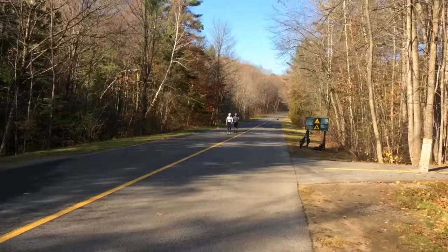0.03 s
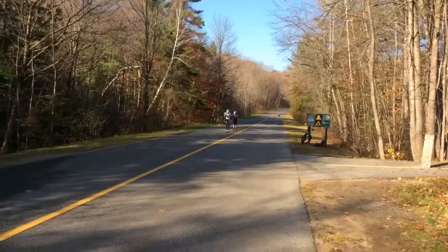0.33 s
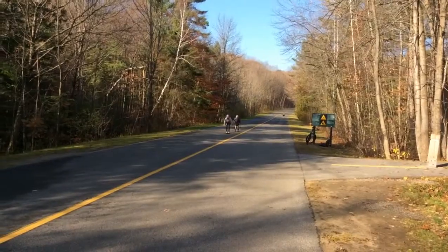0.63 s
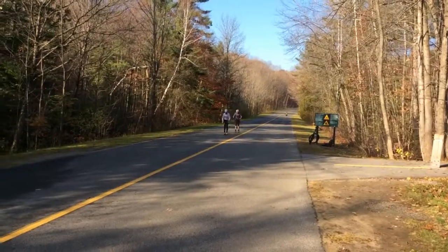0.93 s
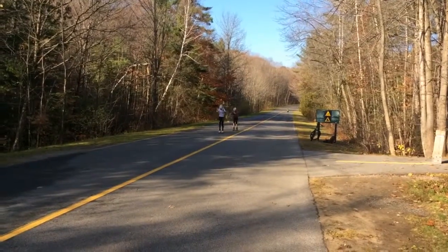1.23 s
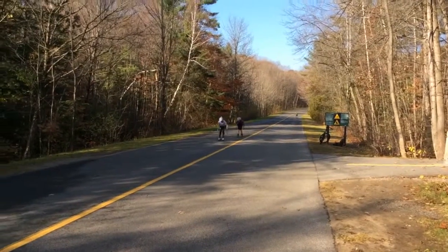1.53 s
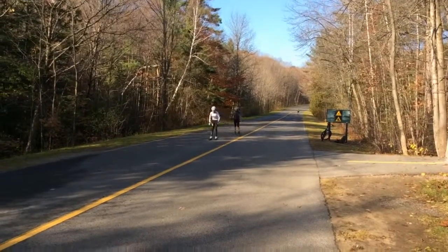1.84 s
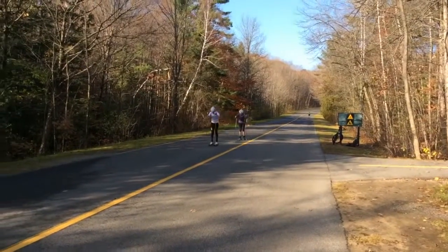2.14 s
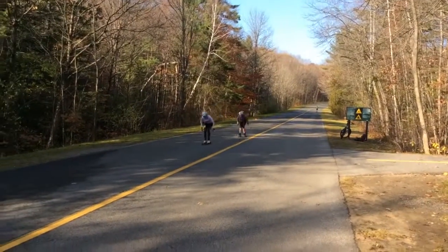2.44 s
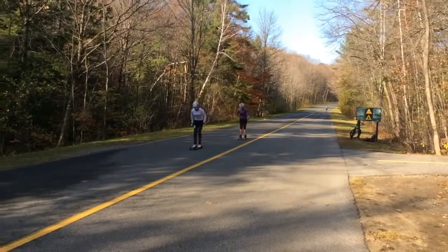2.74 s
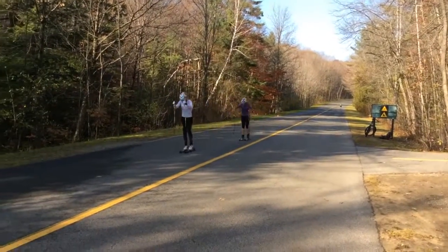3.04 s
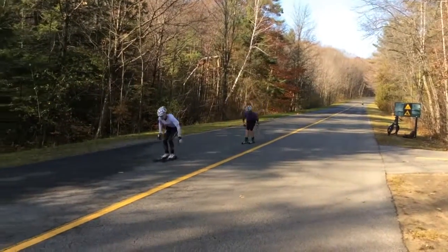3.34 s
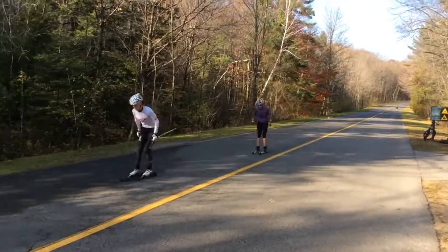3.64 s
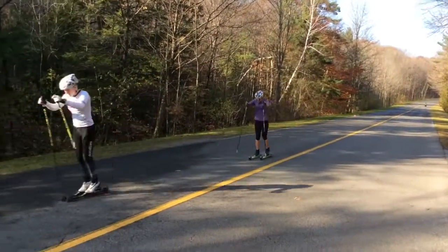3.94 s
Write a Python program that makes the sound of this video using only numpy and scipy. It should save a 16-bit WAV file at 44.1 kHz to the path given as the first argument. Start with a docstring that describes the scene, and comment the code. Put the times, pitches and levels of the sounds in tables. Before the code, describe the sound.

Roller ski poles click and scrape on asphalt, approaching over humming wheels and low wind.

```python
"""Two roller skiers pole toward the microphone along an asphalt road through woods. About once a second
a pair of pole tips strikes the road, skips and bites, then scrapes as the skier pushes off; the trees
answer each click. The wheels hum and hiss ever closer, with a bright sizzle of grit at the end.
Behind it all lies a low rumble of wind."""
import sys
import numpy as np
from scipy import signal
from scipy.fft import rfft, irfft, next_fast_len
from scipy.io import wavfile
from scipy.ndimage import uniform_filter1d, map_coordinates

SR = 44100
rng = np.random.default_rng(int(sys.argv[2]) if len(sys.argv) > 2 else 0)


def wav_out(sig):
    """Save sig, one row per channel (or a flat mono array), as 16-bit PCM at SR to the path in sys.argv[1]."""
    wavfile.write(sys.argv[1], SR, np.round(np.clip(np.atleast_2d(sig).T, -1, 1) * 32767).astype(np.int16))


N = 176400
T = np.arange(N) / SR


def amp(db):
    """Decibels to gain."""
    return np.exp(np.asarray(db) * np.log(10) / 20)


def unit(x):
    """Scaled to rms 1."""
    return x / np.sqrt(np.mean(x ** 2) + 1e-20)


def even(x, size):
    """Held at rms 1 over every size samples."""
    return x / np.sqrt(np.abs(uniform_filter1d(x ** 2, size=size)) + 1e-12)


def along(points, hz):
    """(Hz, value) points read on a log axis."""
    f, v = np.transpose(points)
    return np.interp(np.log(hz + 1), np.log(f + 1), v)


def curve(rows):
    """(s, value) points as one value per sample."""
    return np.interp(T, *np.transpose(rows))


def wobble(rate):
    """A smooth random curve, rate knots a second."""
    return map_coordinates(rng.standard_normal(N // 8), [T * rate], mode="wrap")


def filtered(x, response):
    """x shaped by a gain that depends on frequency."""
    m = next_fast_len(N + SR // 2)
    return irfft(rfft(x, m) * response(np.fft.rfftfreq(m, 1 / SR)), m)[:N]


def grit(colour, grain_db):
    """Coloured noise of rms 1 whose drive jumps, as from stone to stone."""
    drive = rng.standard_normal(N) * amp(grain_db * wobble(rate=900))
    return unit(filtered(drive, lambda hz: amp(along(colour, hz))))


def patchy(x, depth_db):
    """Colour that drifts in patches of frequency and time."""
    z = signal.stft(x, nperseg=1024)[2]
    field = uniform_filter1d(rng.standard_normal(z.shape), size=4, axis=0)
    field = uniform_filter1d(field, size=9, axis=1)
    return unit(signal.istft(z * amp(depth_db * unit(field)), nperseg=1024)[1][:N])


def resonant(modes):
    """Noise ringing in (Hz, width, dB) modes, at an even level."""
    def response(f):
        return sum(amp(db) * 1j * f * w / (c * c - f * f + 1j * f * w) for c, w, db in modes)
    return even(filtered(rng.standard_normal(N), response), size=500)


def burst(start, attack, hold, t60):
    """An envelope that rises, holds and dies away; times in seconds."""
    out = np.zeros(N)
    span = slice(*np.searchsorted(T, [start, start + hold + 2 * t60]))
    t = T[span] - start
    out[span] = np.minimum(t / attack, 1) * amp(-60 * np.maximum(t - hold, 0) / t60)
    return out


# Wind at the roadside (frequency [Hz], relative level [dB])
WIND_COLOUR = [(20, -17), (38, -22.5), (60, -0.5), (80, -2), (105, -0.5), (140, -2.5), (180, -8.5),
               (260, -7.5), (350, -18), (600, -32), (1500, -74.5)]
def wind(bass_limit_hz=29.8):
    """A low, nearly even rumble that falls away under the microphone's bass limit."""
    rumble = filtered(grit(WIND_COLOUR, grain_db=1.03), lambda hz: 1 - np.exp(-(hz / bass_limit_hz) ** 2))
    return amp(-44.5 + .4 * wobble(rate=7.6)) * unit(rumble)


# Decay among the trees (frequency [Hz], time to fall 60 dB [s])
ECHO_DECAY = [(300, 0.64), (2000, 1), (5000, 0.63), (11000, 0.65), (15000, 0.32)]
# Tone of the echo (frequency [Hz], gain [dB])
ECHO_COLOUR = [(500, -3.5), (2500, -2.5), (6000, 3.5), (13000, -3)]
# The echo's share shrinks as the skiers come closer (time [s], relative level [dB])
ECHO_SHARE = [(.5, 3), (1.5, -1), (2.4, 0.5), (3.3, -4.5), (3.48, -8)]
def woods(direct, build_s=.008, blur_s=.00005):
    """Trunks on both sides scatter sound into a dying tail; its many path lengths blur the fine colour."""
    hz, t, noise = signal.stft(rng.standard_normal(SR), SR, nperseg=256)
    shape = amp(-60 * t / along(ECHO_DECAY, hz)[:, None]) * (1 - np.exp(-t / build_s))
    tail = signal.istft(noise * shape, SR, nperseg=256)[1]
    scattered = amp(curve(ECHO_SHARE) - 2.5) * direct
    echo = signal.fftconvolve(scattered, tail / np.linalg.norm(tail))[:N]
    blurred = map_coordinates(echo, [(T + blur_s * wobble(rate=400)) * SR])
    return filtered(blurred, lambda f: amp(along(ECHO_COLOUR, f)))


# Wheels on the road: drone, hum, distant hiss, the leader's hiss and the grit under the leader
# (frequency [Hz], relative level [dB])
DRONE_COLOUR = [(100, -18), (170, -5), (240, 0), (320, -2), (400, -11.5), (600, -28), (1500, -57)]
HUM_COLOUR = [(100, -14), (190, -4.5), (280, 3), (450, -8), (580, -1.5), (700, -7.5), (850, -15),
              (2000, -48)]
FAR_COLOUR = [(300, -13.5), (800, -9.5), (1200, -1), (1600, -1.5), (2200, 3), (2900, -6), (4500, -6.5),
              (5500, -10), (7300, -25.5), (10500, -20), (13500, -29), (15500, -38)]
NEAR_COLOUR = [(250, -4.5), (700, 1), (1050, -1.5), (1220, -6), (1500, 3.5), (1950, 1.5), (2900, -3.5),
               (3400, -2.5), (5000, -5), (7300, -27), (10500, -16), (13500, -27), (15500, -37)]
SIZZLE_COLOUR = [(3000, -39), (7300, -16), (9000, 9), (10500, -17), (12000, -6), (14000, 11), (15300, 2)]
# The same five at the microphone during the approach (time [s], level [dB])
DRONE_DB = [(.1, -61.5), (1.8, -56.5), (2.25, -47), (2.6, -54.5), (3.1, -53.5), (4, -53)]
HUM_DB = [(.1, -52.5), (.95, -52), (1.25, -48.5), (1.9, -49), (2.7, -55.5), (4, -54)]
FAR_DB = [(0, -56.5), (.45, -58.5), (.9, -54), (1.3, -55.5), (2, -52), (3, -54.5), (4, -52)]
NEAR_DB = [(0, -65), (2.2, -61.5), (2.8, -51), (3.2, -50.5), (3.55, -43.5), (3.75, -46), (4, -47)]
SIZZLE_DB = [(0, -100), (3.2, -87), (3.6, -74), (3.85, -62.5), (4, -59)]
def wheels():
    """Small wheels roll on coarse asphalt, dull from down the road, brighter and sizzling close up."""
    drone = amp(curve(DRONE_DB)) * grit(DRONE_COLOUR, grain_db=.5)
    hum = amp(curve(HUM_DB) + .34 * wobble(rate=14)) * patchy(grit(HUM_COLOUR, 1.5), depth_db=1.5)
    far = amp(curve(FAR_DB) + .7 * wobble(rate=9)) * patchy(grit(FAR_COLOUR, .7), depth_db=1.5)
    near = amp(curve(NEAR_DB) + .19 * wobble(rate=18)) * patchy(grit(NEAR_COLOUR, 1.35), depth_db=1.4)
    sizzle = amp(curve(SIZZLE_DB) + 1.2 * wobble(rate=17)) * grit(SIZZLE_COLOUR, grain_db=5)
    return drone + hum + far + near + sizzle


# Modes of the hollow pole (frequency [Hz], width [Hz], relative level [dB])
SHAFT_MODES = [(1023, 51, -3), (1660, 30, 6), (1950, 110, -2.5), (2410, 27, 2), (2784, 64, 0.5),
               (3640, 35, -3.5), (4280, 99, -8), (5254, 89, -9)]
def shaft(contact):
    """Contact noise with the ring of the pole shaft in it."""
    return unit(contact + amp(-7.5) * resonant(SHAFT_MODES))


# A tip grinding on asphalt (frequency [Hz], relative level [dB])
GRIND_COLOUR = [(300, -10), (600, -1.5), (1000, 3), (1300, 1), (2000, -3.5), (2900, -1.5), (3900, 3.5),
                (5200, -8.5), (7300, -23), (10800, -12.5), (13000, -15.5), (15500, -35)]
# Stick-slip squeak (frequency [Hz], width [Hz], relative level [dB])
SQUEAK_MODES = [(1970, 31, 2), (2055, 81, -14), (2400, 21, -8), (4070, 25, -22)]
# Push-offs, far to near (time [s], level [dB], length [s], squeak over grind [dB])
PUSH_OFFS = [(0.72, -42.5, 0.011, -7), (0.755, -55, 0.028, -11), (1.604, -47, 0.062, -17),
             (1.683, -44, 0.038, -17), (2.481, -45, 0.031, -18), (2.517, -39, .036, -17),
             (2.588, -42, 0.035, -15), (3.463, -44.5, 0.0073, 7), (3.474, -36, 0.025, 1.5),
             (3.534, -45, 0.02, 3)]
def pole_scrapes(sag_db=3.5):
    """The tips scrape over the stones as they leave the road; the last, nearest scrapes squeak."""
    grind = even(shaft(grit(GRIND_COLOUR, grain_db=4)), size=400)
    squeak = resonant(SQUEAK_MODES)
    out = np.zeros(N)
    for start, db, length, squeak_db in PUSH_OFFS:
        progress = np.clip((T - start) / length, 0, 1)
        force = burst(start, attack=.006, hold=length, t60=.079) * amp(db - sag_db * progress)
        out += force * (grind + amp(squeak_db) * squeak)
    return out


# Knock and tick of a tip striking the road (frequency [Hz], relative level [dB])
KNOCK_COLOUR = [(300, -32), (700, -18), (1000, -0.5), (1200, -9.5), (1600, -0.5), (2600, 2.5), (3200, -1.5),
                (5100, -4.5), (6000, -11), (7500, -19.5), (11000, -22)]
TICK_COLOUR = [(5000, -53), (7500, -42.5), (9000, -3), (10600, 6), (13200, 3), (15500, -13)]
# Pole plants, far to near
# (time [s], touch level [dB], skip until the bite [s], bite level [dB], tick trim [dB], ring trim [dB])
POLE_PLANTS = [(.535, -45, 0.00197, -41, 0.5, 0.5), (.606, -44, 0.0019, -40, 1.5, 0),
               (1.4087, -42.5, .0075, -42, 1, 11.5), (1.4545, -48, 0.0047, -42.5, -3, -14),
               (1.5068, -45, 0.0025, -37, -2, -10), (2.349, -41.5, 0.0055, -39.5, -1, -14),
               (2.4215, -38.5, .006, -38.5, -2, -23), (3.2638, -31.5, .0062, -31, 3, -9),
               (3.298, -30, .008, -33, 2.5, -19), (3.542, -56, 0.0011, -47.5, 6.5, -14)]
def pole_plants(attack_s=.00049, ring_hz=2420):
    """Each tip touches, skips and bites: a gritty knock, a bright tick and a short ring of the shaft."""
    knock = even(shaft(grit(KNOCK_COLOUR, grain_db=1.5)), size=120)
    tick = even(grit(TICK_COLOUR, grain_db=5.5), size=120)
    out = np.zeros(N)
    for start, touch_db, skip, bite_db, tick_db, ring_db in POLE_PLANTS:
        bite = start + skip
        def force(hold, t60):
            return np.maximum(amp(touch_db) * burst(start, attack_s, hold, t60),
                              amp(bite_db) * burst(bite, attack_s, hold, t60))
        out += knock * force(hold=.0026, t60=.022)
        out += amp(tick_db - 7) * tick * force(hold=.0016, t60=.012)
        ring = np.sin(2 * np.pi * ring_hz * (T - bite)) * burst(bite, attack_s, 2 * attack_s, t60=.0041)
        out += 2 * amp(bite_db + ring_db) * ring
    return out


def scene():
    """From the roadside: the poles and their echo, over wheels and wind, in mono."""
    clicks, scrapes = pole_plants(), pole_scrapes()
    echo = woods(clicks + amp(-2) * scrapes)
    return (clicks + scrapes + echo + wheels() + wind())[None]


OPEN_S, TOP_HZ = .068, 15400
def record(dry):
    """The microphone opens just after the start and keeps nothing above its band limit."""
    fade_in = np.clip((T - OPEN_S) / .004, 0, 1)
    return filtered(dry[0] * fade_in, lambda hz: hz < TOP_HZ)[None]


dry = scene()
out = record(dry)
wav_out(out)
```